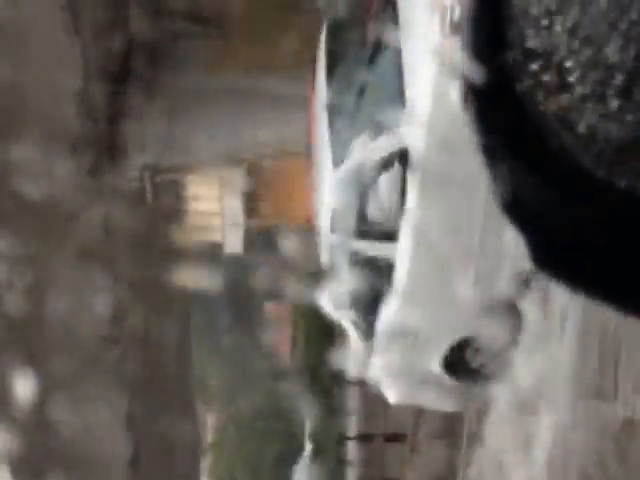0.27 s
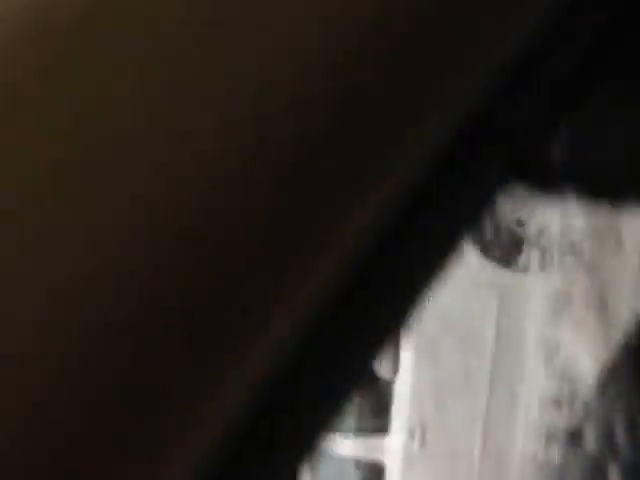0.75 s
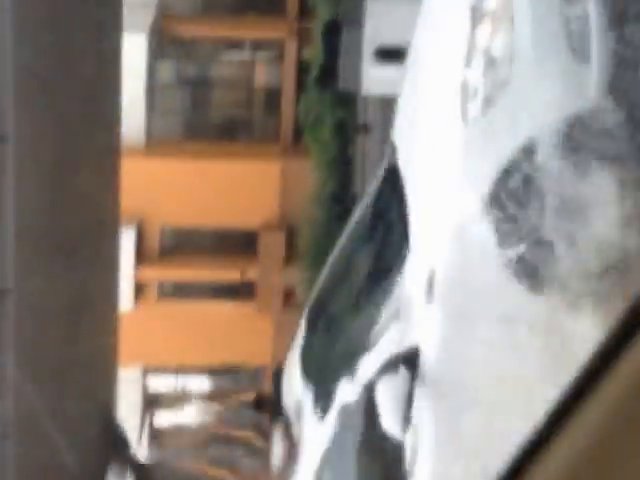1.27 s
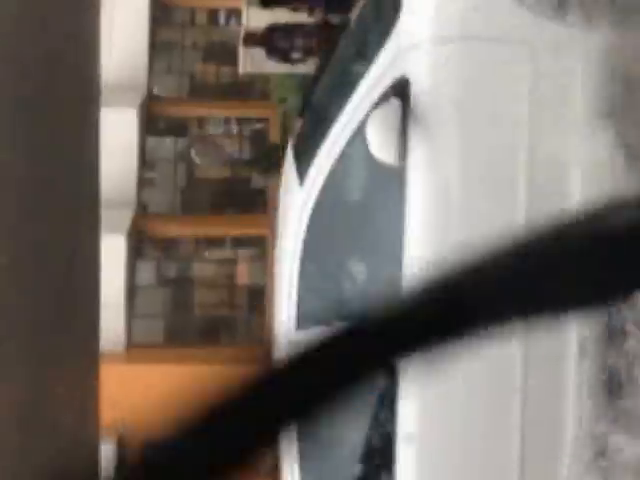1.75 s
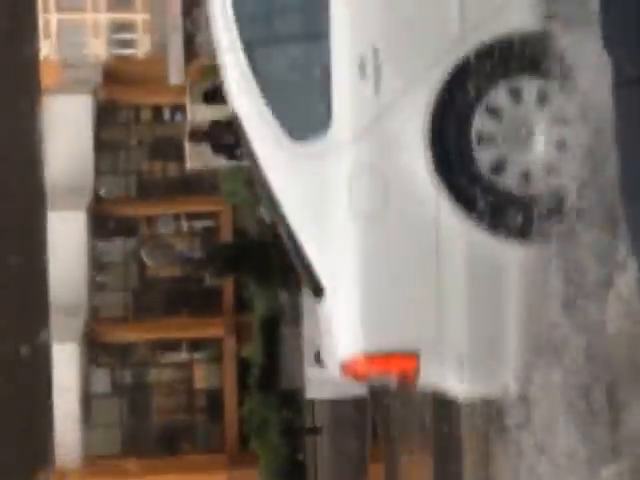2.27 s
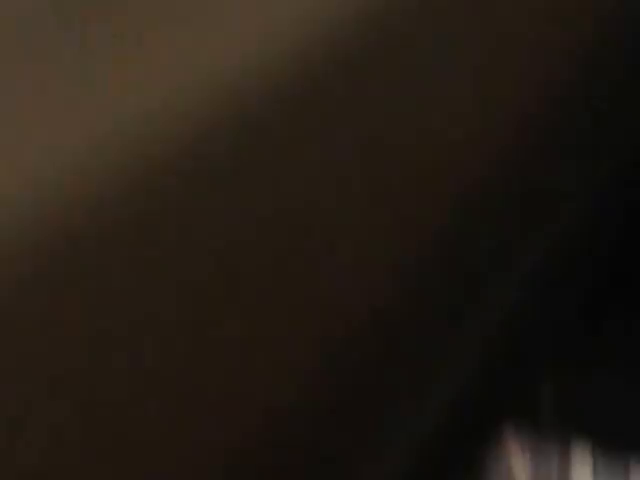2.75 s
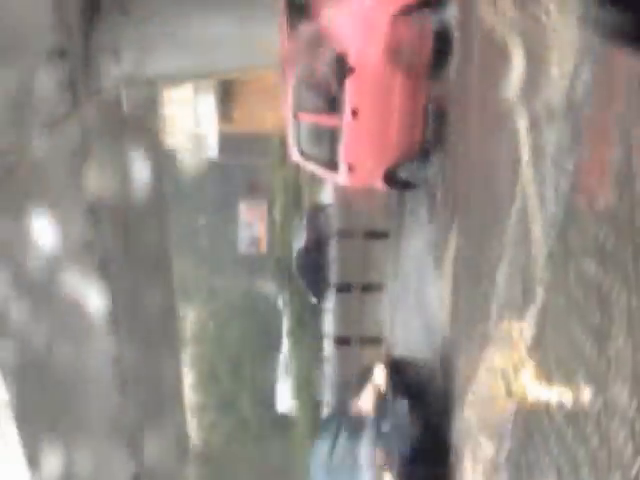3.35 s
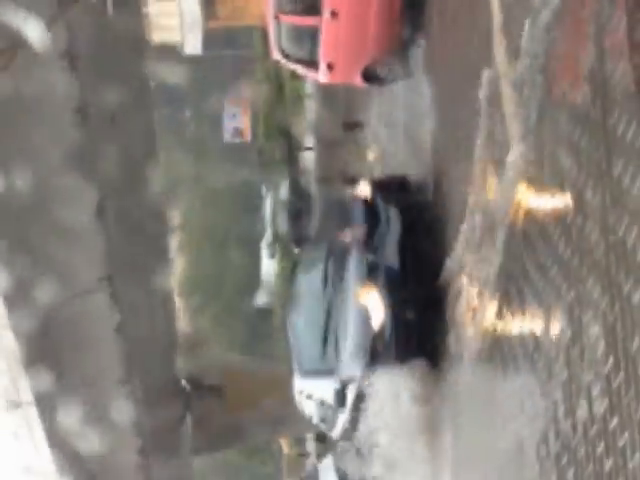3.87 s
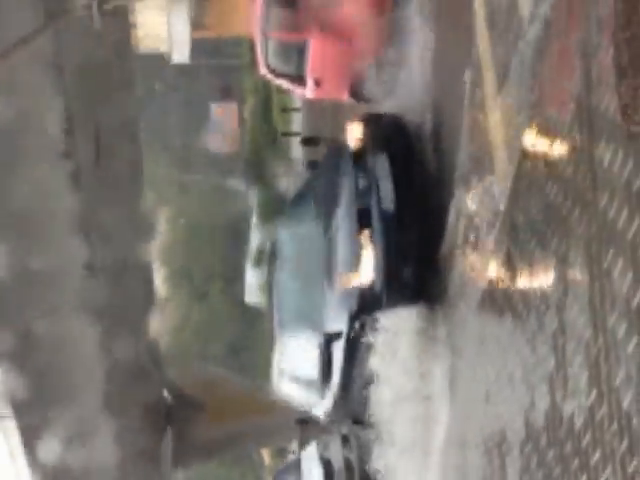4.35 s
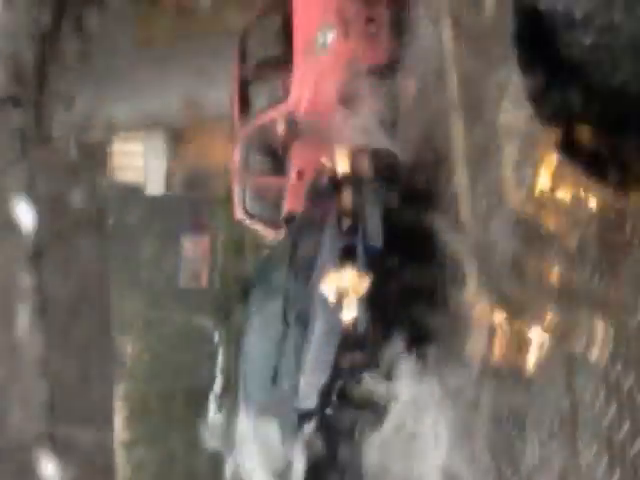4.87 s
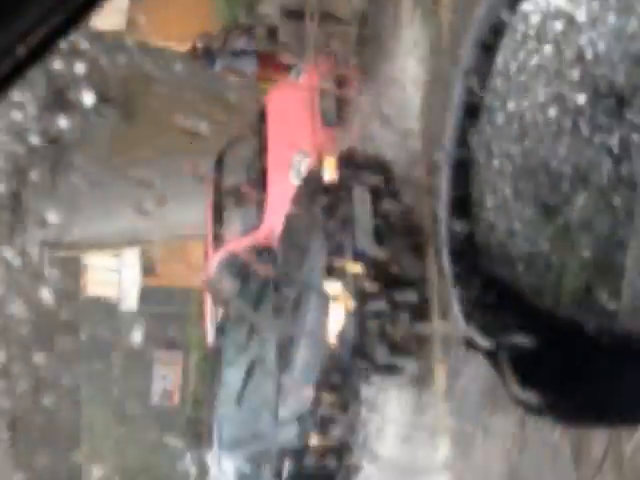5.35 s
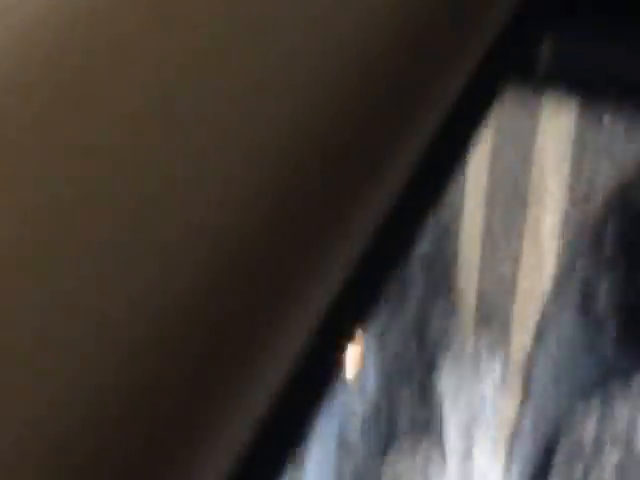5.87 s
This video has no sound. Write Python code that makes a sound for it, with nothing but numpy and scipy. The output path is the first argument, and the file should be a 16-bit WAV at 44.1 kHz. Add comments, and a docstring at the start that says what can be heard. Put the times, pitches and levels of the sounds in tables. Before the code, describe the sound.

The sound is heard from the front seat of a closed car in a downpour. Throughout, rain makes a soft, dense hiss and patter on the glass, with fine spray and dull, uneven drumming on the roof. The wipers dominate: heavy low thumps at about 0.2, 1.0, 1.9, 2.8, 3.7, 4.6 and 5.4 seconds, each a small clack, a run of rubber slaps and a brief cabin boom. Halfway between, from 0.6 seconds, come lighter, softer knocks. The blades swish and shudder faintly, and a thin motor whine wavers with each cycle, fading after 4.4. Extra soft booms fall near 1.5, 3.8 and 4.2. Single drops tap the near glass now and then, clearer around 2.4 and 3.5. A crisp fat splash strikes the side window at 4.65, a weaker one at 5.2, and the rain grows slightly stronger to the end at 6.1.

```python
"""Heavy rain heard from inside a car that stands in traffic with its wipers at full speed.
Random tiny impacts and hiss make the patter on the glass and the drumming on the roof.
Single drops tap close by, and two fat splashes of shaped noise hit the side window.
The wiper motor whines; at each turn the rubber flips in a run of slaps and the arms knock the body,
hard at the bottom and lightly at the top. Hard knocks and a few soft bumps make the cabin boom."""
import sys
import numpy as np
from scipy import signal
from scipy.fft import rfft, irfft, next_fast_len
from scipy.io import wavfile

SR = 44100
rng = np.random.default_rng(int(sys.argv[2]) if len(sys.argv) > 2 else 0)


def output_pcm(signal):
    """Save a mono or channel-first signal as 16-bit PCM at the path in sys.argv[1].

    Samples are clipped to [-1, 1] before scaling.
    """
    pcm = np.clip(np.atleast_2d(signal).T, -1, 1) * 32767
    wavfile.write(sys.argv[1], SR, np.round(pcm).astype(np.int16))


N = 269451
TIME = np.arange(N) / SR   # seconds

# Tone colours of noise. Columns: pitch_hz, relative_db (power per Hz)
PATTER_COLOUR = [(300, -6.5), (600, 7), (900, 5), (1150, 1.5), (1600, 3), (2400, -0.5), (3100, 1),
                 (4000, -5), (5200, -14), (7000, -18), (12000, -45)]
SPRAY_COLOUR = [(3000, 4.5), (5000, 1.5), (6400, -3.5), (7500, -3.5), (10000, -5.5), (11600, -5),
                (12100, -15.5), (13000, -25.5)]
ROOF_COLOUR = [(20, -63.5), (35, -1.5), (50, 2), (85, 9), (105, 6), (140, 7), (180, 5.5), (220, -8.5),
               (300, -12.5), (400, -20.5), (520, -19.5), (900, -58)]
# rubber slapping the windscreen
SLAP_COLOUR = [(120, 2.5), (230, 4.5), (350, -1.5), (450, -6.5), (560, -12.5), (700, -18.5), (950, -22.5),
               (1400, -34), (3000, -36.5), (9000, -65)]
SPLASH_COLOUR = [(300, -7), (900, -11), (1500, -4), (2300, 3), (3000, 8), (3700, 0.5), (4400, 5),
                 (5500, -3.5), (6600, -0.5), (7500, -19), (13000, -35)]

# Rain levels over time, before the trims below. Columns: time_s, level_db
# downpour on the glass
RAIN_LEVEL = [(0.0, -54), (0.51, -58), (1.17, -54), (3.27, -57), (3.84, -55), (4.46, -55), (5.43, -53),
              (6.11, -52.5)]
# fine spray on the side window
SPRAY_LEVEL = [(0.0, -71.5), (1.0, -72.5), (2.07, -72), (4.37, -72), (5.38, -70), (5.67, -67.5),
               (6.11, -68)]
# drumming on the roof
ROOF_LEVEL = [(0.0, -35), (0.37, -36), (1.02, -32), (1.22, -39), (2.01, -32.5), (2.47, -37), (2.98, -35),
              (3.37, -38.5), (4.63, -36), (4.81, -42.5), (5.38, -37.5), (6.11, -38.5)]
PATTER_TRIM_DB, SPRAY_TRIM_DB, ROOF_TRIM_DB = 1.5, 6, 0.5
FLING_DB, FLING_HOLD_S = 1, 0.097   # water flung off the blades at the top adds to the patter

# Wiper motor through one cycle, slowing under load; the whine is an octave above the hum.
# Columns: after_bottom_turn_s, hum_hz, whine_db (both before their random drift)
MOTOR_CYCLE = [(0.08, 352, -68.5), (0.17, 386, -59.5), (0.205, 369.5, -63), (0.25, 393.6, -68),
               (0.33, 372.6, -78), (0.55, 383, -60), (0.621, 355, -65), (0.76, 377, -61),
               (0.87, 384.3, -75.5)]
SHUDDER_DB, SHUDDER_POWER = -33, 1.98   # the arms shudder as they slow toward a turn

# Single drops on the near glass. Columns: start_s, level_db (before an 8 dB cut), pitch_hz
NEAR_DROPS = [(0.1201, -42, 2450), (0.5252, -43, 2590), (0.9098, -40, 1330), (1.4524, -38.5, 1640),
              (2.3467, -45, 3053), (2.4169, -41.5, 2690), (2.5164, -40, 3200), (3.4565, -35, 3130),
              (3.4998, -41, 1410), (5.0714, -37.5, 2140), (5.1477, -39, 3470), (5.4131, -37, 1630),
              (5.9004, -41, 1170), (6.0888, -34, 1680)]

# Wiper turns at the bottom of the windscreen.
# Columns: start_s, flip_db, knock_db, hardness (factor on the contact cut), frame_clack_db
BOTTOM_TURNS = [(0.1654, -22.5, 0.4, 0.78, -8.5), (1.0444, -23, 2.2, 1.23, -19),
                (1.9252, -21.5, 1.3, 1.05, -13.5), (2.8076, -21.5, 0.9, 1.02, -10),
                (3.6881, -26.5, 3.5, 0.65, -16), (4.5694, -25.5, 0.7, 0.98, -13),
                (5.4496, -29.5, 2, 0.78, -30)]
# Lighter turns at the top. Columns: start_s, flip_db, knock_db, hardness (factor on the contact cut)
TOP_TURNS = [(0.596, -34.5, -7, 0.8), (1.471, -36, -14.5, 1.24), (2.351, -33.5, -13, 1.33),
             (3.235, -37, -13.5, 0.8), (4.117, -35, -10, 0.87), (4.996, -34.5, -11, 1.12),
             (5.874, -34.5, -10, 0.85)]
# Contacts that make up every knock. Columns: delay_s, level_db (added to the knock),
# contact_cut_hz (before the hardness factor)
BOTTOM_CONTACTS = [(0.01, -12, 900), (0.024, -2, 222), (0.037, -8.5, 115), (0.062, -17, 450)]
TOP_CONTACTS = [(0.017, -1, 90), (0.056, -2, 80)]

# Ringing tones. Columns: pitch_hz, level_db, time_to_fall_60_db_s
# car body and cabin air
BODY_MODES = [(61.7, -22, 0.31), (84.5, -17.5, 0.25), (122, 4, 0.076), (147.7, -1, 0.13), (189, -19, 0.11),
              (200.1, -4, 0.12), (269.8, -10.5, 0.12), (392, -24, 0.023), (486, -24, 0.057)]
# steel frame of a wiper blade
FRAME_MODES = [(315, -7, 0.081), (364, -1.5, 0.068), (439, -3.5, 0.036)]
# deep boom of the closed cabin
BOOM_MODES = [(98, 0, 0.069)]
BOOM_DELAY_S, BOOM_DB = 0.01685, 0.5   # delay after the turn; level over the knock
# Soft, heavy bumps that make the cabin boom. Columns: start_s, level_db
BUMPS = [(1.4874, 3), (3.759, 2), (4.175, -1)]

# Fat splashes on the side window. Columns: start_s, level_db, fade_s, fine_spray_db
SPLASHES = [(4.6442, -31, 0.0045, -41.5), (5.191, -44, 0.012, -48)]
# wash of droplets around each splash: level over its fine spray, head start and fade
RUNOFF_DB, RUNOFF_LEAD_S, RUNOFF_FADE_S = -17, 0.075, 0.098


def from_db(db):
    """Turn decibels into a gain."""
    return 10 ** (np.asarray(db) / 20)


def rms_one(x):
    """Scale a sound to an average power of 1."""
    return x / np.sqrt(np.mean(x ** 2) + 1e-20)


def colour(x, spectrum):
    """Filter to a given tone colour without sounding early, keeping the power of white noise."""
    size = next_fast_len(N + SR // 2, True)
    hz, db = np.transpose(spectrum)
    log_hz = np.log(np.maximum(np.fft.rfftfreq(size, 1 / SR), 1))
    below = np.maximum(np.log(hz[0]) - log_hz, 0)
    bass_fall = np.exp(-2 * below)   # 12 dB an octave under the first point
    gain = rms_one(from_db(np.interp(log_hz, np.log(hz), db)) * bass_fall)
    # folding the cepstrum gives the minimum-phase filter with this gain
    cepstrum = irfft(np.log(gain + 1e-6), size)
    cepstrum[1:size // 2] *= 2
    cepstrum[size // 2 + 1:] = 0
    response = np.exp(rfft(cepstrum))
    return irfft(rfft(x, size) * response, size)[:N]


def drift(rate):
    """Slow random wander with spread 1; a higher rate in Hz wanders faster."""
    step = 40   # samples between the slow points
    r = np.exp(-2 * step * np.pi * rate / SR)
    noise = rng.standard_normal(N // step + 2002)
    slow = signal.lfilter([1], [1, -2 * r, r * r], noise)[2000:]   # skip the filter's start
    return np.interp(np.arange(N) / step, np.arange(len(slow)), rms_one(slow))


def resonate(x, hz, width):
    """One resonance, width in Hz, with gain 1 at its peak."""
    r = np.exp(-np.pi * width / SR)
    top = np.array([1, 0, -1]) * (1 - r * r) / 2
    bottom = [1, -2 * r * np.cos(2 * np.pi * hz / SR), r * r]
    return signal.lfilter(top, bottom, x + 1e-18)


def impacts(per_s, spread_db):
    """Random tiny impacts, many small and a few large, with an average power of 1."""
    sizes = from_db(spread_db * np.minimum(rng.exponential(1, N), 4))
    signs = rng.choice([-1, 1], N)
    return rms_one(sizes * signs * (rng.random(N) < per_s / SR))


def burst(start, rise, hold, fade):
    """Loudness shape that rises, holds and dies away; all times in seconds."""
    age = TIME - start
    return np.clip(age / rise, 0, 1) * np.exp(-np.clip((age - hold) / fade, 0, 20))


def push(start, cut_hz):
    """Force of a soft contact, of total 1: the lower its cut, the softer and longer it is."""
    age = np.clip((TIME - start) * 2 * np.pi * cut_hz, 0, 20)
    force = age * np.exp(-age)
    return force / force.sum()


def strike(force, modes, swell_s):
    """Ringing tones driven by a force; each swells through the panels before it dies."""
    age = TIME[:SR // 2]
    ringing = sum(from_db(db - 60 * age / t60) * np.sin(2 * np.pi * hz * age)
                  for hz, db, t60 in modes)
    swell = 1 - np.exp(-age / swell_s)
    return signal.fftconvolve(force, swell * ringing)[:N]


def cabin(x, wet_db, fade, count=8):
    """Quickly dying reflections between the windows; each part of the glass has its own path."""
    age = TIME[:SR // 20]
    part, out = rng.integers(count, size=N), 0
    for k in range(count):
        echoes = rng.standard_normal(len(age)) * np.exp(-age / fade) * (age > .001)
        response = from_db(wet_db) * echoes / np.linalg.norm(echoes)
        response[0] = 1   # the direct sound
        response = response / np.linalg.norm(response)
        out = out + signal.oaconvolve(x * (part == k), response)[:N]
    return out


def pats(per_s, cycles, spread_db, count=40):
    """Each drop rings the glass briefly at a pitch set by where it lands; average power 1."""
    pitches = np.geomspace(600, 6500, count)
    drops, spot = impacts(per_s, spread_db), rng.integers(count, size=N)
    return rms_one(sum(resonate(drops * (spot == k), hz, hz / cycles)
                       for k, hz in enumerate(pitches)))


def rain_on_glass():
    """Ticks, ringing pats and spray come in flurries over the smooth wash of the street."""
    flurry = from_db(3.5 * drift(15))
    ticks = cabin(impacts(per_s=1900 * flurry, spread_db=3.0), wet_db=5, fade=0.0027)
    ringing = pats(per_s=900 * flurry, cycles=14.5, spread_db=3.5)
    wash = rng.standard_normal(N)
    mix = from_db(-0.5) * ticks + from_db(-8.0) * ringing + from_db(-5.5) * wash
    patter = rms_one(colour(mix, PATTER_COLOUR))
    fling_db = FLING_DB * sum(burst(s, rise=0.015, hold=FLING_HOLD_S, fade=0.027)
                              for s, *_ in TOP_TURNS)
    patter_db = PATTER_TRIM_DB + np.interp(TIME, *np.transpose(RAIN_LEVEL)) + fling_db

    droplets = impacts(per_s=6000 * flurry, spread_db=3.5)
    spray = rms_one(colour(from_db(-0.5) * droplets + rng.standard_normal(N), SPRAY_COLOUR))
    spray_db = SPRAY_TRIM_DB + np.interp(TIME, *np.transpose(SPRAY_LEVEL))
    return from_db(patter_db) * patter + from_db(spray_db) * spray


def rain_on_roof():
    """Random drop impacts make the lined roof drum dully."""
    roof_db = ROOF_TRIM_DB + np.interp(TIME, *np.transpose(ROOF_LEVEL))
    return from_db(roof_db) * colour(impacts(per_s=900, spread_db=2.0), ROOF_COLOUR)


def wiper_motor():
    """The motor hums and whines an octave higher, its pitch sagging with the load."""
    bottoms = [row[0] for row in BOTTOM_TURNS]
    age = (TIME - bottoms[0]) % np.mean(np.diff(bottoms))   # seconds into the wiper cycle
    s, hz, db = np.transpose(MOTOR_CYCLE)
    hum_hz = np.interp(age, s, hz) * (1 + 0.005 * drift(13.0))
    phase = 2 * np.pi * np.cumsum(hum_hz) / SR
    whine = from_db(np.interp(age, s, db) + 2.8 * drift(4.1)) * np.sin(2 * phase)
    hum = from_db(-61.5 + 4.4 * drift(14)) * np.sin(phase)
    fading = from_db(np.interp(TIME, [4.4, 5.0], [0, -5]))   # both grow fainter toward the end
    return np.sqrt(2) * fading * (whine + hum)


def sweep_speed():
    """Speed of the blades: 0 at each turn, 1 at mid-sweep."""
    turns = sorted(row[0] for row in BOTTOM_TURNS + TOP_TURNS)
    sweep_s = np.mean(np.diff(turns))
    turns = [turns[0] - sweep_s, *turns, turns[-1] + sweep_s]
    return np.abs(np.sin(np.pi * np.interp(TIME, turns, np.arange(len(turns)))))


def wiper_sweep():
    """The rubber rubs with a swish, loudest at mid-sweep, and shudders when slow."""
    speed = sweep_speed()
    swish = from_db(-51.5) * speed * colour(rng.standard_normal(N), SLAP_COLOUR)
    slowness = (1 - speed ** 2) ** (SHUDDER_POWER / 2)
    shaking = colour(impacts(per_s=600, spread_db=2.0), ROOF_COLOUR)
    return swish + from_db(SHUDDER_DB) * slowness * shaking


def near_drops():
    """Big drops tap on the glass close by, each a short burst of noise at its own pitch."""
    fizz = rng.standard_normal(N)
    taps = 0
    for s, db, hz in NEAR_DROPS:
        tone = rms_one(resonate(fizz, hz, 0.096 * hz))
        taps = taps + from_db(db - 8) * burst(s, rise=0.0007, hold=0.0015, fade=0.0072) * tone
    return signal.sosfilt(signal.butter(2, 6000, fs=SR, output="sos"), taps)   # the glass dulls them


def wiper_flips():
    """The rubber lip tips over along its length in a short run of slaps."""
    flipping = sum(from_db(db) * burst(s + 0.00078, rise=0.003, hold=0.019, fade=0.018)
                   for s, db, *_ in BOTTOM_TURNS + TOP_TURNS)
    return colour(flipping * impacts(per_s=1100, spread_db=0.5), SLAP_COLOUR)


def wiper_knocks():
    """One arm stops, then the other, then the linkage settles; at the bottom the frame clacks first."""
    on_body = 0
    for turns, contacts in ((BOTTOM_TURNS, BOTTOM_CONTACTS), (TOP_TURNS, TOP_CONTACTS)):
        for s, _, knock_db, hardness, *_ in turns:
            for delay, db, cut_hz in contacts:
                on_body = on_body + from_db(knock_db + db) * push(s + delay, hardness * cut_hz)
    on_frame = sum(from_db(clack_db) * push(s + 0.00327, cut_hz=560)
                   for s, *_, clack_db in BOTTOM_TURNS)
    clacks = strike(on_frame, FRAME_MODES, swell_s=0.0023)
    return clacks - strike(on_body, BODY_MODES, swell_s=0.0067)


def cabin_boom():
    """Hard knocks and a few soft, heavy bumps set the cabin air booming for a few cycles."""
    knocks = sum(from_db(knock_db + BOOM_DB) * push(s + BOOM_DELAY_S, cut_hz=185)
                 for s, _, knock_db, *_ in BOTTOM_TURNS)
    bumps = sum(from_db(db) * push(s, cut_hz=98) for s, db in BUMPS)
    return -strike(knocks + bumps, BOOM_MODES, swell_s=0.013)


def fat_splashes():
    """Water bursts on the side window as noise, with fine spray and a wash of droplets around it."""
    splash, spray, runoff = 0, 0, 0
    for s, db, fade, spray_db in SPLASHES:
        splash = splash + from_db(db) * burst(s, rise=0.00071, hold=0.0042, fade=fade)
        spray = spray + from_db(spray_db) * burst(s, rise=0.0014, hold=0.0052, fade=fade)
        wash = burst(s - RUNOFF_LEAD_S, rise=0.023, hold=0.15, fade=RUNOFF_FADE_S)
        runoff = runoff + from_db(spray_db + RUNOFF_DB) * wash
    return (colour(splash * rng.standard_normal(N), SPLASH_COLOUR) + spray * rng.standard_normal(N)
            + colour(runoff * impacts(per_s=6300, spread_db=3.0), SPRAY_COLOUR))


def scene():
    """Rain and wipers as they reach the front seat."""
    rain = rain_on_glass() + rain_on_roof()
    wipers = wiper_motor() + wiper_sweep() + wiper_flips() + wiper_knocks()
    return (rain + wipers + near_drops() + cabin_boom() + fat_splashes())[None]


def record(dry):
    """The microphone loses the deepest bass, and the top is cut steeply above 13100 Hz."""
    thin = signal.sosfilt(signal.butter(2, 32, "high", fs=SR, output="sos"), dry)
    return signal.sosfilt(signal.ellip(10, .2, 80, 13100, fs=SR, output="sos"), thin)


dry = scene()
out = record(dry)
output_pcm(out)
```